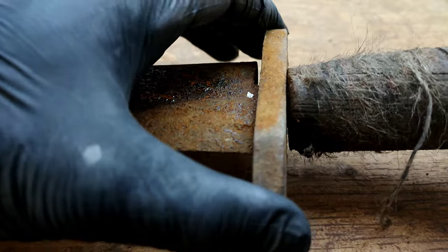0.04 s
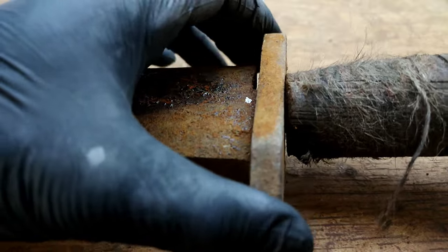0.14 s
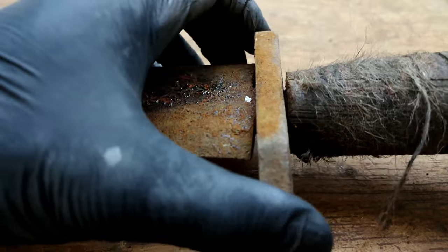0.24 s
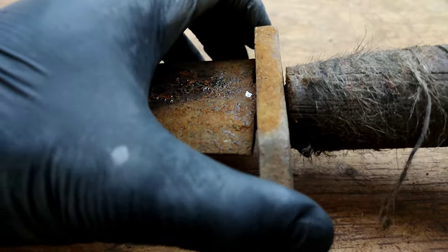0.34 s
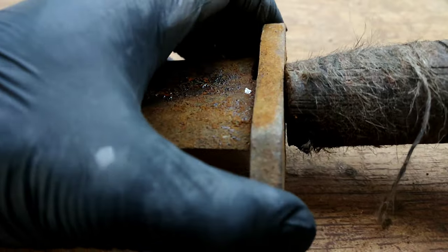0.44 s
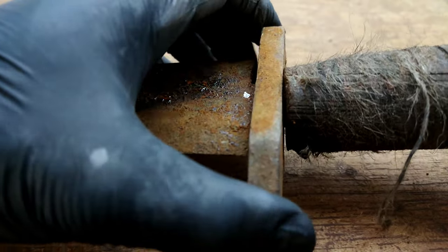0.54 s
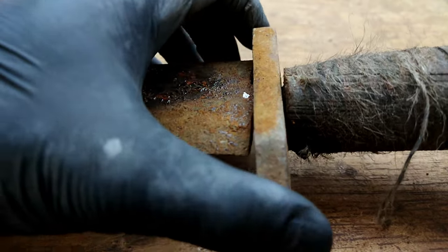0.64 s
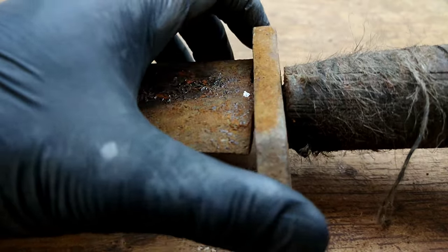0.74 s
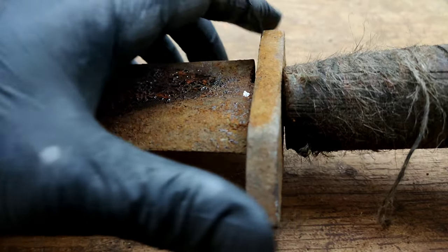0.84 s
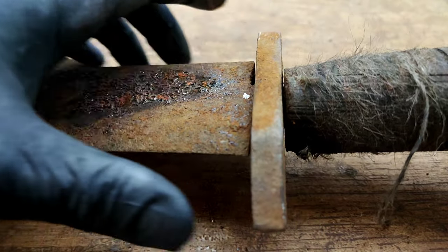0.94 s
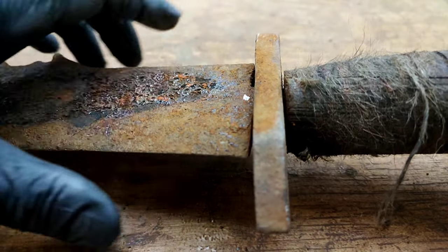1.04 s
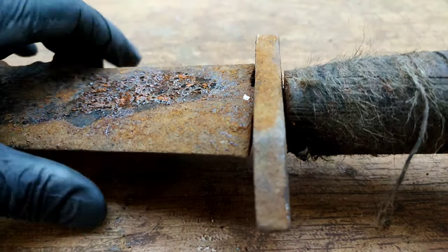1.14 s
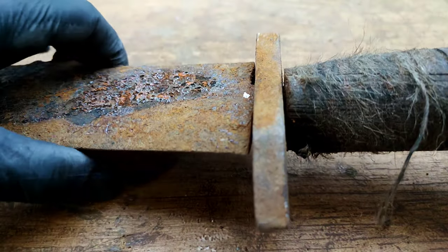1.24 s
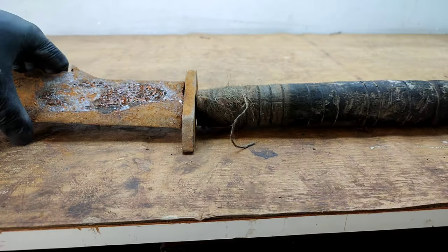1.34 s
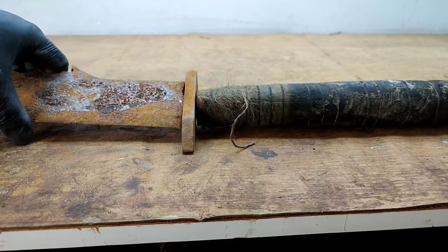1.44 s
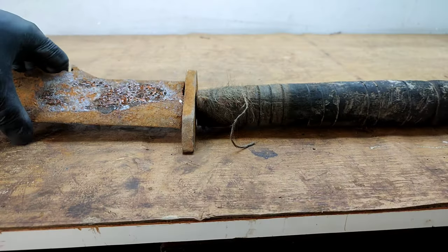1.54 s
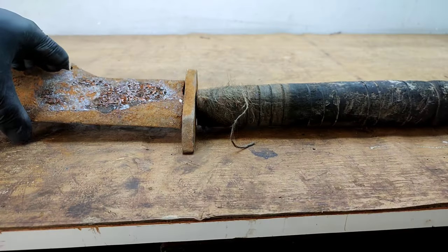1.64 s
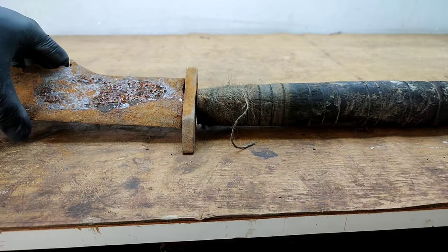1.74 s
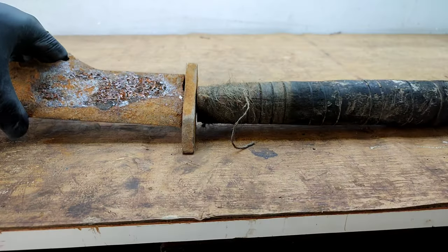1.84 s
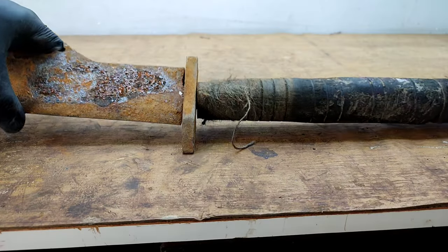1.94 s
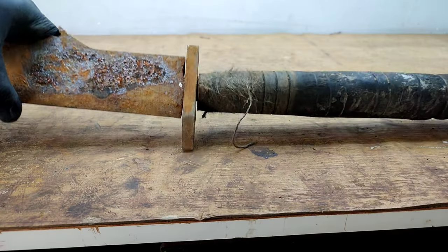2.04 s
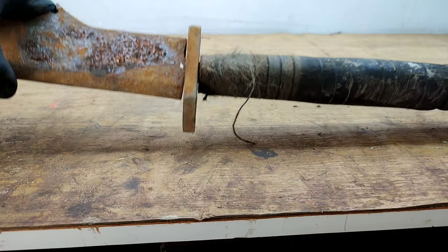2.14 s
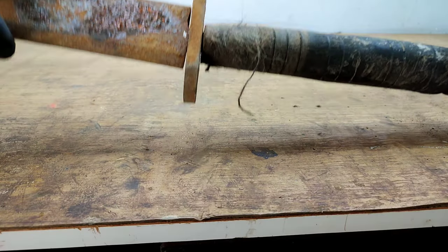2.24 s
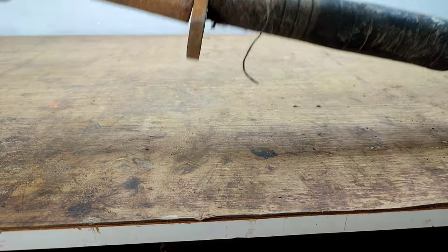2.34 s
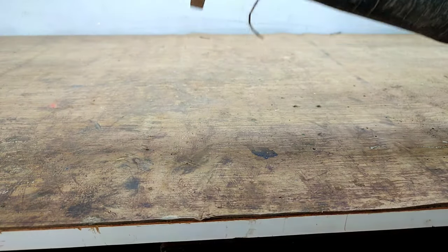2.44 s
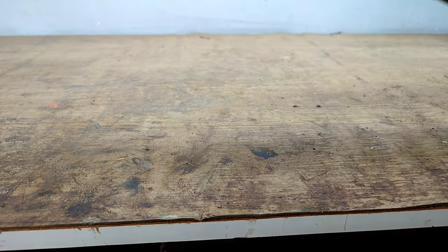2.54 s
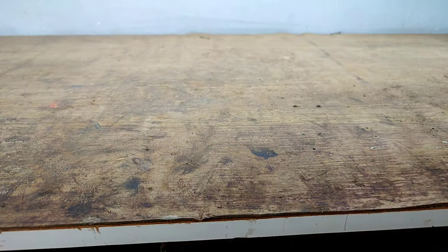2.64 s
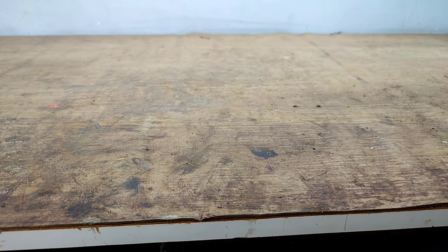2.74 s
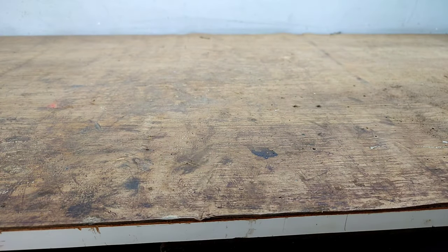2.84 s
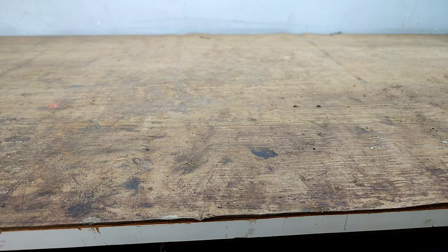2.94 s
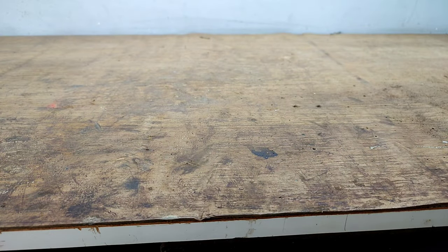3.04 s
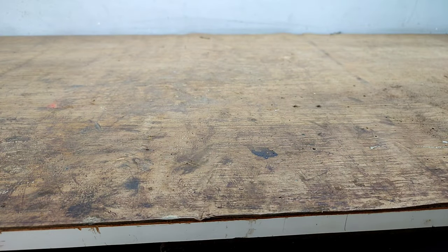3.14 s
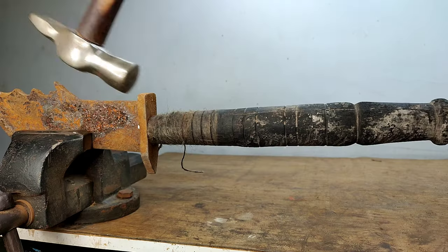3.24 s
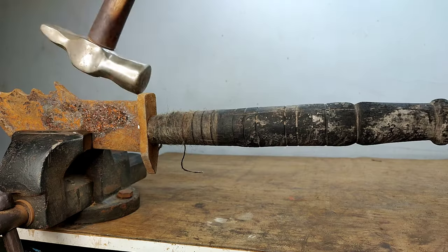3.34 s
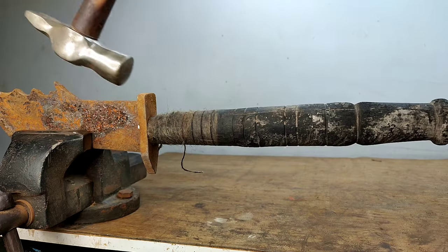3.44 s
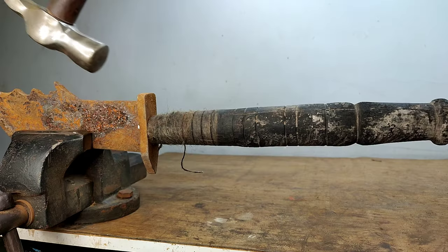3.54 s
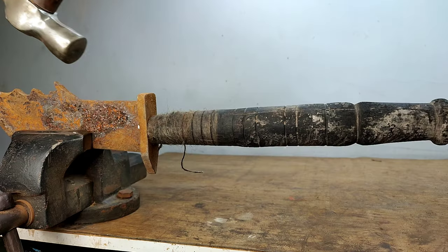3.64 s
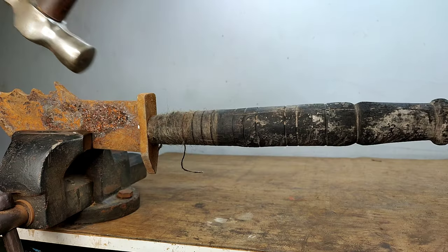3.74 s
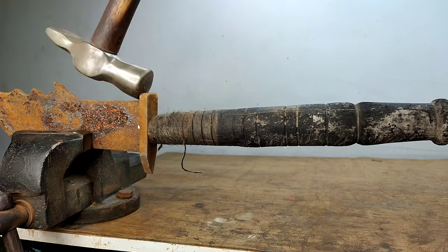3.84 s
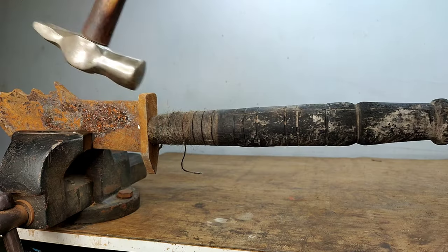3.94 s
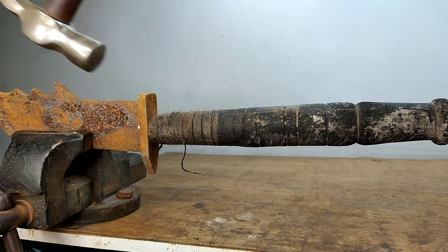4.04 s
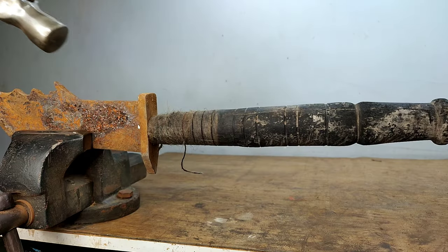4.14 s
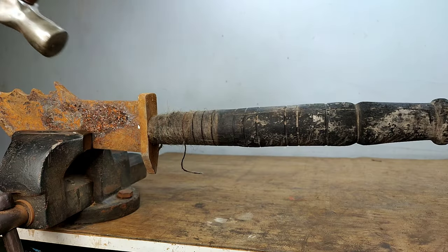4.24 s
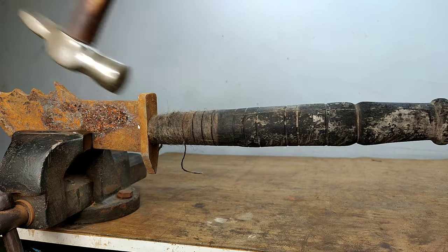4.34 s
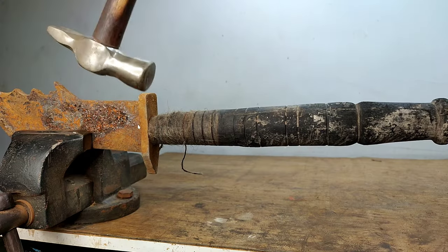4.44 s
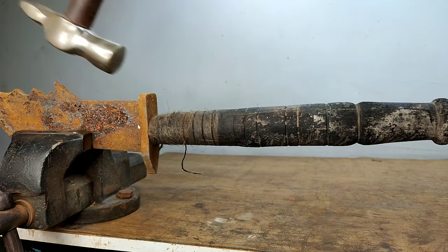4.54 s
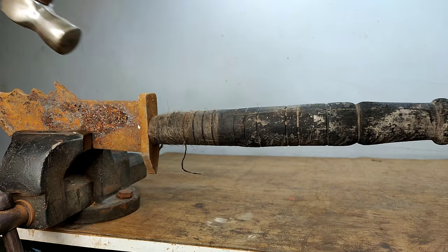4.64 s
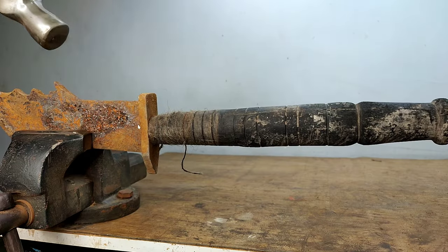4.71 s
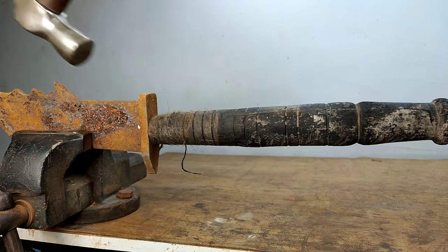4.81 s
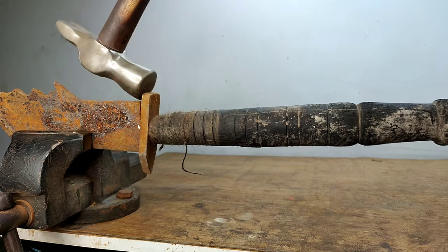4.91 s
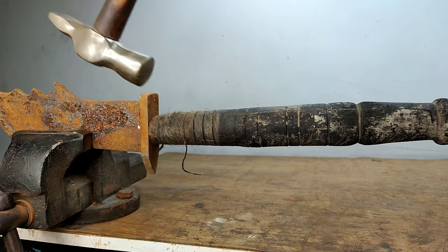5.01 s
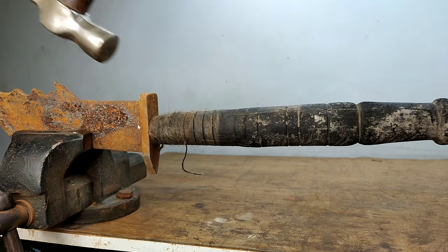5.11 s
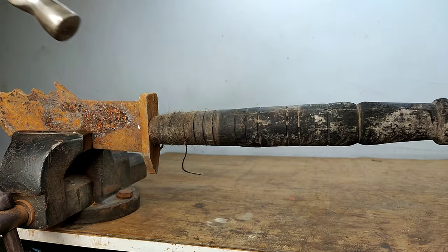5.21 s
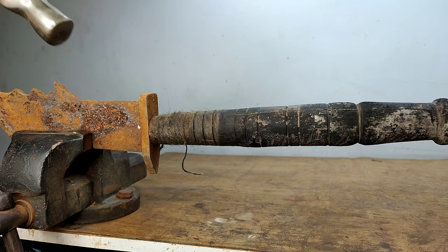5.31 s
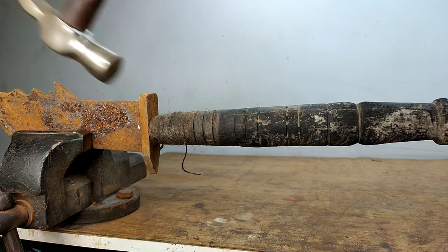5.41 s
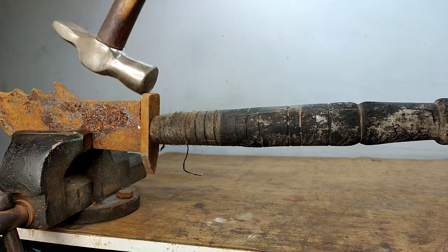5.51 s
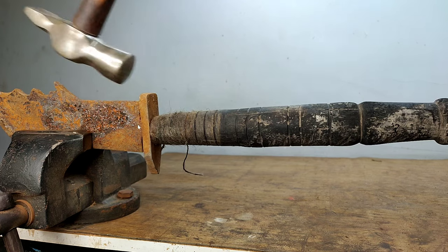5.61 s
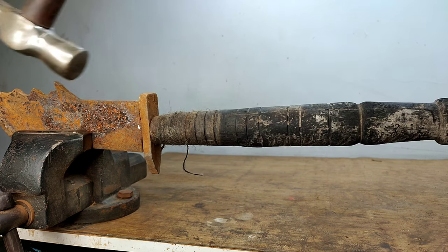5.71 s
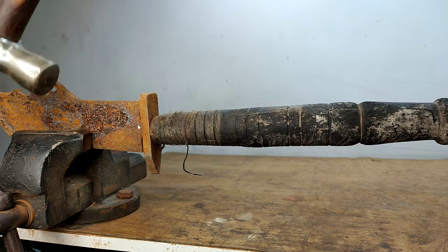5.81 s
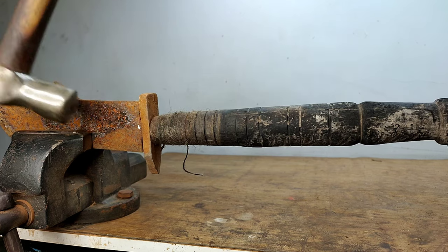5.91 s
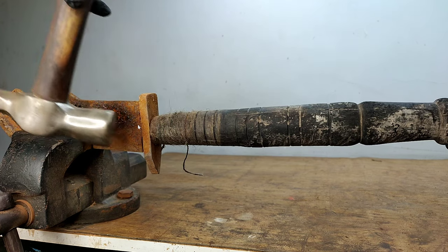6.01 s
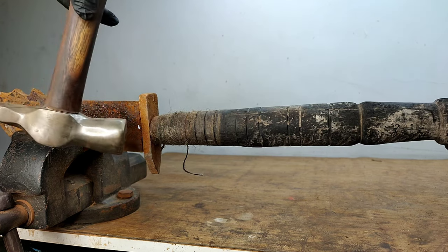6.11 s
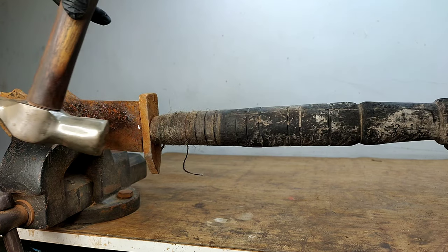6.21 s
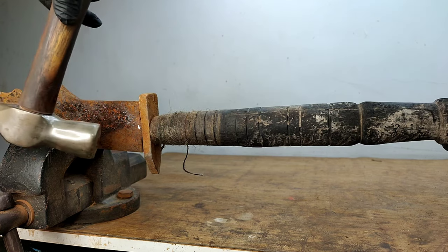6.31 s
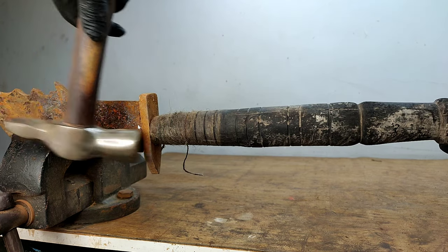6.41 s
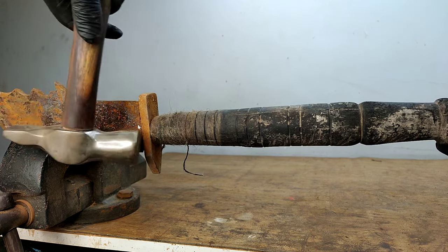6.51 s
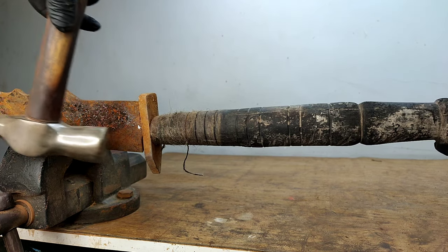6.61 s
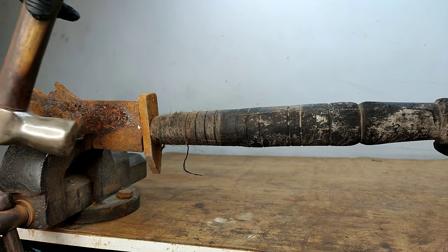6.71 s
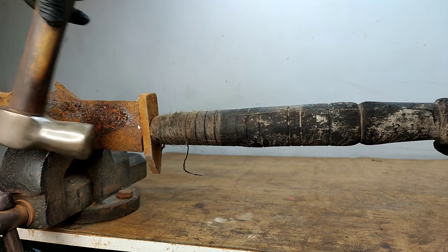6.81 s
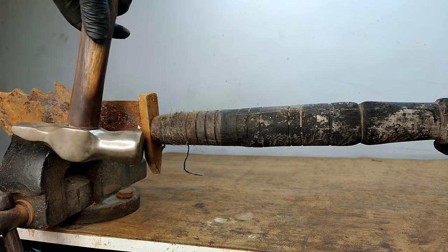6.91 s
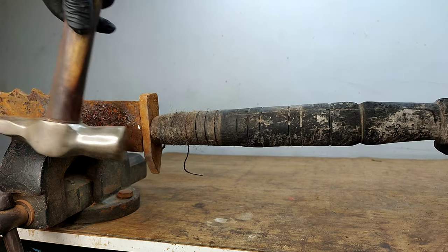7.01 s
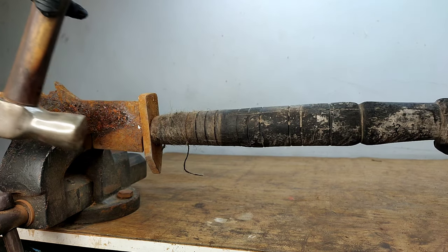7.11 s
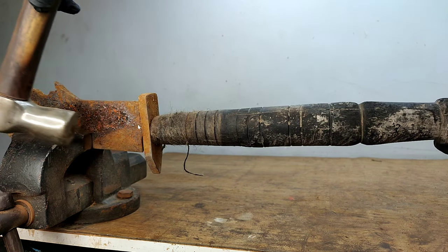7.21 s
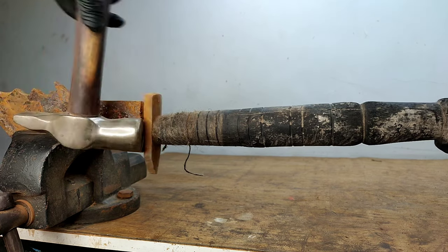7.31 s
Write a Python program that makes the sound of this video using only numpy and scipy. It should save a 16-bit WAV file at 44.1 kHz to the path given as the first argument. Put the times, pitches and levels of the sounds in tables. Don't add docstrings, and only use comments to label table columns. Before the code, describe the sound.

Gloved hands rub and knock a rusty blade on a wooden bench, then a small hammer strikes it seven times in a vise, loud and ringing.

```python
import sys
import numpy as np
from scipy import signal
from scipy.fft import next_fast_len
from scipy.io import wavfile
from scipy.ndimage import uniform_filter1d

SR = 44100
rng = np.random.default_rng(int(sys.argv[2]) if len(sys.argv) > 2 else 0)


def voltage_ratio(decibels):
    exponent = np.asarray(decibels, float) / 20
    return 10 ** exponent


def to_wav(s):
    ch = np.atleast_2d(s).T
    pcm = np.round(np.clip(ch, -1, 1) * 32767)
    wavfile.write(sys.argv[1], SR, pcm.astype(np.int16))


N = 324576

# f/Hz, level/dB per Hz
AIR = [(15, -27), (25, -4.5), (60, -1.5), (110, -10), (180, -13), (260, -19.5), (420, -31), (750, -40),
       (1400, -45), (14500, -54.5)]
AIR_DB = -54.5
# f/Hz, width/Hz, level/dB
DRONE = [(30, 1.9, -4.5), (56, 1.8, -6.5), (90.4, 1.9, -10.5), (154, 4, -17), (194, 8, -15.5)]
# start t/s, rumble level/dB, hiss level/dB
STRETCHES = [
    (0, -59.5, 0.5),
    (1.43, -64.5, -1.5),
    (3.2, -65, -1.5),
    (3.45, -59.5, 1),
]
# multiple of MOTOR_HZ/1, level/dB
MOTOR = [(1, -63), (2, -57), (3, -61), (4, -75)]
MOTOR_HZ, MOTOR_WAVER_DB = 46.7, 2.1
# f/Hz, likeness/1
LIKENESS = [(60, 0.86), (180, 0.99), (330, 0.76), (540, -0.022), (1610, -0.12), (4830, -0.042),
            (14400, -0.01)]
EDGES_HZ = 22 * 2 ** np.arange(0, 9.5, 1 / 3)

# start t/s, length t/s, low rub level/dB, bright rustle level/dB
STROKES = [(0.0, 0.059, -73, -89), (0.066, 0.087, -63.5, -77), (0.262, 0.028, -65, -82),
           (0.354, .09, -71, -72.5), (0.532, 0.047, -72, -70), (0.724, 0.078, -76, -74),
           (0.935, 0.059, -66, -72), (0.998, 0.018, -61, -63.5), (1.147, 0.036, -83, -71),
           (1.275, 0.081, -61, -69.5), (1.4, 0.0079, -66, -64.5), (1.707, .04, -71, -76),
           (1.957, 0.13, -69, -78), (2.145, 0.015, -68, -71.5), (2.212, 0.085, -69, -81),
           (2.494, .04, -70, -76), (2.548, 0.05, -68, -85)]
GRIP_DB_PER_S, LET_GO_DB_PER_S = 700, 236
# start t/s, length t/s, level/dB, favoured f/Hz
DRAGS = [
    (0, 0.088, -79.5, 1500),
    (0.357, 0.06, -88, 1500),
    (.6, .15, -89, 2200),
    (2.26, .2, -96, 1150),
]
# f/Hz, level/dB, decay t60/s
DRAG_MODES = [(740, -3.5, 0.05), (1020, 0.5, 0.025), (1500, -8, 0.02), (1820, -8, .02), (2060, -4, 0.022),
              (2250, -6, .018), (2450, -8, 0.02)]
# f/Hz, level/dB, decay t60/s
LIFTED_MODES = [(205, 1, .12), (330, -7, .1), (420, -12, .08), (500, -7, .06), (740, -9, .07),
                (1095, -2, .045), (1230, -6, .06), (1600, -18, .04), (1830, -11, .03), (2400, -13, .03)]
LIFTED_S = 2.0
# t/s, peak level/dB, favoured f/Hz
KNOCKS = [(0.124, -48.5, 1000), (0.262, -62.5, 2300), (0.563, -37, 1700), (0.586, -44.5, 895),
          (0.79, -52.5, 800), (0.811, -47.5, 1080), (0.962, -50.5, 650), (0.966, -61, 2300),
          (0.989, -41.5, 1700), (1.283, -69, 1800), (1.322, -61, 1530), (2.211, -54, 1250),
          (2.232, -48, 1090), (2.25, -48.5, 600), (3.074, -68, 800)]
# f/Hz, level/dB, decay t60/s
KNOCK_MODES = [(209, -5.5, 0.15), (355, -9, 0.1), (465, -12, 0.06), (605, -1, 0.04), (730, -3, 0.04),
               (1022, 3, 0.026), (1180, -12, 0.03), (1525, -10, 0.02), (1810, -1, 0.018), (2030, -7, .03),
               (2160, -1, 0.02), (2390, -1, 0.018), (2905, -12, .018)]
FAVOUR_DB_PER_OCT = 8.5
GRIT_DB, GRIT_T60_S = -19.5, 0.053
# t/s, peak level/dB, f/Hz
SNAPS = [
    (1.0894, -64, 3030),
    (1.9795, -54, 3390),
    (2.178, -43, 2680),
    (2.548, -44, 10000),
]

# f/Hz, level/dB, decay t60/s
WALLS = [(150, -6, 2.36), (390, 3.5, 1.41), (800, 5.5, 0.92), (1720, 4.5, 0.89), (3200, 4, 0.78),
         (7100, 7.5, 0.61), (10000, 9, 0.48), (14600, 6, 0.52)]
# f/Hz, width/Hz, share removed/1
NULLS = [(298, 64, 0.5), (835, 50, 0.4), (1197, 60, .3)]
SPOT_SHIFT = .04

# t/s, peak level/dB, room send level/dB, bench level/dB, boom level/dB
FIRST_BLOW = [
    (3.4481, -1.5, -6, 3, -3),
]
TOP_BLOWS = [
    (3.9936, -2.5, 0.61, 8.3, 3.5),
    (4.5416, -5.5, 0.48, 6.7, 0.1),
    (5.0685, -3, 1, 7.2, 1.7),
    (5.6203, -2, 1, 4.5, -0.4),
]
SIDE_BLOW = [
    (6.5922, -4, -4.5, -4, -1.5),
]
LAST_BLOW = [
    (7.0508, -2.1, 0.015, 0.67, 0),
]
# head squeal f/Hz, squeal level/dB, thud f/Hz, thud level/dB
TOUCHES = [
    (6300, -16.5, 440, -32.5),
    (6250, -11, 170, -21.5),
    (6300, -9, 250, -20),
    (6400, -8, 280, -19.5),
    (6170, -11.5, 262, -18),
    (6120, -40, 343, -19.5),
    (6370, -13, 320, -27),
]
SQUEAL_DELAYS_S = [-.0027, -.0003, -.0001, -.0004, -.001, .0005, .0003]
SQUEAL_S, SQUEAL_PARTNER = .0036, 1.16
THUD_T60_S, THUD_PAN_DB = .05, 5
# delay t/s, level/dB
FIRST_CONTACTS = [
    (-.0024, 0.5),
    (.002, 3),
    (.005, 2),
    (.009, -0.5),
]
CONTACTS = [
    (-.002, -15),
    (0.0003, -4),
    (.0031, 5.5),
    (.0048, 2),
    (.0075, -1),
    (.011, -6),
]
SIDE_CONTACTS = [
    (-.002, -25),
    (.0006, 6),
    (.0024, 2),
    (.0044, 3),
    (.006, 1),
]
# f/Hz, level/dB per Hz
FIRST_CRACK = [(88, -42.5), (150, -10.5), (1700, -16), (2590, -21.5), (3450, -6), (3950, -12.5),
               (7710, -17), (9700, -31.5), (11100, -30.5), (13200, -53), (14500, -83)]
TOP_CRACK = [(88, -38.5), (150, -15), (823, -16.5), (2640, -14.5), (2910, -11.5), (4180, -17), (6370, -9.5),
             (9700, -21.5), (10500, -19.5), (13700, -21), (14500, -41)]
SIDE_CRACK = [(88, -31), (150, 18.5), (595, -8), (1520, 7), (1770, -15), (2220, 5), (5160, 0.5),
              (7710, -10), (11500, -90), (12400, -29.5), (14500, -38)]
# f/Hz, level/dB, decay t60/s
FIRST_GUARD = [(1592, -15, 0.014), (2900, -17, .02), (3490, -2.5, 0.03), (4520, -13.5, 0.011),
               (5460, -10.5, 0.01), (6260, -12, 0.011), (7450, -8, 0.014)]
TOP_GUARDS = [
    [(1090, -8, 0.017), (1590, -20.5, 0.01), (2970, -16, .02), (3750, -7, 0.028), (4700, -10.5, .02),
     (5440, -12, .015), (6250, -8, .012), (7490, -11.5, .015), (8750, -12, 0.022), (10150, -13, .035)],
    [(1500, -6, .018), (3040, -18, .012), (3490, -6, .03), (3800, -9, .02), (5500, -7.5, .02),
     (6230, -3.5, .02), (7300, -8, .02), (8860, -13, 0.022), (10400, -11, .035)],
    [(2104, -13.5, 0.018), (2500, -10, .018), (2900, -2.5, .025), (3680, -12.5, .02), (4830, -12, 0.018),
     (5200, -13.5, .015), (6660, -9, 0.018), (7100, -11, .015), (8350, -9.5, .02), (10500, -1.5, .035)],
    [(2830, -12.5, .02), (3166, -4, .025), (3800, -5, .025), (4614, -11.5, .02), (5280, -10.5, .02),
     (6000, -9.5, .02), (6520, -7, .02), (6850, -11, .015), (10250, -6, .035)],
]
SIDE_GUARD = [(1468, -8.5, 0.028), (2064, -5, 0.021), (2550, -21, 0.014), (3220, -16, 0.016),
              (5810, -30, 0.005), (7260, -14, 0.013), (10200, -44, 0.016)]
LAST_GUARD = [(1549, -22, 0.024), (2256, -4.5, 0.04), (2734, -8, 0.028), (3200, -15, 0.013),
              (3870, -10.5, 0.017), (6530, -4, 0.012), (7700, -3, 0.0143), (10230, -14.5, 0.023)]
# f/Hz, level/dB, decay t60/s
HAMMER = [(6635, -28.5, .13), (6560, -33, .05), (6310, -31, .035), (6440, -30, .04), (8750, -33, .04),
          (10350, -32, .07), (12220, -38, .06), (13400, -37, .06)]
# guard f/Hz, guard ring level/dB, hammer ring level/dB
TONES = [
    (3570, -13, -13.5),
    (4430, -22.5, -4),
    (3530, -18.5, -5),
    (2426, -18, -4),
    (3550, -18, -1.5),
    (2020, -39, -25),
    (2307, -24, -7.5),
]
# f/Hz, level/dB, decay t60/s
BENCH = [(345, -15, .12), (378, -14, .12), (412, -17, .1), (447, -15, .1), (474, -14, .12), (510, -19, .1),
         (546, -13, .14), (580, -18, .1), (607, -13, .14), (640, -17, .1), (673, -14, .14), (705, -16, .1),
         (745, -14, .12), (770, -17, .09)]
# f/Hz, level/dB, decay t60/s
BENCH_TOP = [(857, -16, 0.059), (950, -20.5, 0.046), (977, -17, 0.096), (1010, -15.5, 0.2),
             (1041, -26, 0.14), (1063, -19.5, 0.098)]
# low f/Hz, high f/Hz, upper modes level/dB
SPOTS = [
    (421, 634, -12),
    (610, 770, -8),
    (480, 680, -11),
    (460, 680, -4.5),
    (655, 940, -5),
    (340, 460, -20.5),
    (374, 400, -5.5),
]
SPOT_EDGE_DB_PER_OCT = 80
# f/Hz, level/dB
RINGS = [
    [(447, -15.5), (562, -13), (592, -22), (625, -25), (861, -22)],
    [(335, -26), (545, -22.5), (607, -17.5), (640, -17), (671, -17.5), (729, -20), (775, -22)],
    [(335, -22.5), (485, -23), (518, -26.5), (565, -13.5), (605, -19), (628, -16.5), (672, -24)],
    [(335, -21.5), (450, -24.5), (483, -17.5), (518, -20), (605, -14.5), (636, -17.5), (671, -19.5),
     (1085, -21.5)],
    [(224, -15.5), (248, -13), (330, -19), (672, -17), (694, -17.5), (728, -15.5), (760, -17)],
    [(205, -17), (250, -12.5), (378, -17), (1030, -25)],
    [(205, -14.5), (250, -13.5), (378, -15.5), (432, -16), (453, -15.5)],
]
RING_T60_S, LOOSE_DB = 0.21, -6
MONO_BELOW_HZ = 400
SHIVER_DB, SHIVER_RISE_S, SHIVER_T60_S = -34, 0.018, 1.106
# f/Hz, level/dB per Hz
FIRST_WASH = [(88, -48), (150, -3), (216, 0), (287, -21), (329, -10), (473, -3.5), (760, -13.5),
              (1300, -11), (5790, -16), (6490, -18), (8490, -30.5), (11100, -28), (13700, -33),
              (14500, -73)]
TOP_WASH = [(88, -28), (150, -4), (304, -14), (410, -13.5), (580, -16), (850, -8), (1030, -15),
            (1410, -12.5), (3450, -11.5), (5060, -15.5), (6490, -15), (8170, -22), (10500, -20.5),
            (13400, -34.5), (14500, -58)]
SIDE_WASH = [(88, -3.5), (150, 2), (251, -3.5), (304, -10), (335, -3.5), (455, -17.5), (530, -4),
             (906, -13), (2100, -14.5), (4180, -15.5), (12700, -43), (14500, -82)]
LAST_WASH = [(88, -7), (150, 0), (251, -4.5), (304, -7), (369, -13), (748, -9.5), (941, -17), (2060, -6),
             (6750, -16), (10500, -27.5), (11100, -76), (12700, -66), (14500, -79)]
# f/Hz, width/Hz, share removed/1 (below 0 added)
NODES = [
    [(2670, 300, 0.33), (1570, 200, 0.25)],
    [(1360, 150, 0.77), (2700, 230, .35), (3200, 250, 0.28), (5600, 710, 0.32), (440, 210, .5)],
    [(2570, 350, .4), (2900, 260, 0.98), (4740, 300, .75), (420, 120, .5), (7100, 500, -0.81),
     (3500, 300, -.5)],
    [(1490, 370, .3), (3570, 400, .3), (5420, 300, .35), (400, 120, 0.87), (4950, 250, .6),
     (2900, 200, -0.15)],
    [(2510, 410, .45), (3200, 500, -0.48), (1300, 100, -0.32), (162, 60, .8), (560, 100, 0.57)],
    [(1300, 220, -0.61), (1730, 330, 0.14), (2090, 140, -0.87), (3020, 380, -0.82), (3750, 180, -0.039),
     (774, 280, 0.42)],
    [(1270, 270, -1.1), (1700, 350, 0.45), (2450, 300, -0.68), (3030, 210, 0.59), (3380, 350, -0.48),
     (6050, 370, 0.47)],
]
# f/Hz, level/dB, decay t60/s, build-up delay t/s
BOOM = [(31.5, -22, .65, 0), (47, -20, 1.4, .0013), (55, -12, .72, .0065), (66, -18, .88, .0045),
        (80, -23, .6, .003), (89.5, -18, .6, .0047), (100, -22, .6, .001), (111, -25, .7, .004),
        (123, -23, 1.0, .002), (147, -30, .9, .003), (210, -35, 1.1, .002), (250, -34, 1.0, .002)]

# t/s, duck level/dB, baseline sag/1
DUCKS = [
    (3.439, 0.4, 0.01),
    (3.994, 6, 0.1),
    (4.541, 7.5, 0.09),
    (5.067, 7.5, 0.13),
    (5.62, 8, 0.14),
    (6.59, 1.4, 0.03),
    (7.048, 7, 0.03),
]
DUCK_S, SAG_DELAY_S, SAG_S = 0.097, 0.0047, 0.031
# start t/s, end t/s
CUTS = [
    (1.421, 1.437),
    (3.92, 3.934),
]
# low f/Hz, high f/Hz, share/1
RIGHT_LIFT = [(1500, 3800, .06), (4000, 7000, 0.14), (8000, 10000, -0.094)]
MIC_TOP_HZ = 13900


def rms_one(x):
    return x / np.sqrt(np.mean(x ** 2) + 1e-20)


def at_hz(points, hz, axis=1):
    points = np.array(points)
    return np.interp(np.log(hz), np.log(points[:, 0]), points[:, axis])


def ring(clicks, hz, t60):
    r = voltage_ratio(-60 / (max(t60, .002) * SR))
    w = 2 * np.pi * hz / SR
    return signal.lfilter([0, np.sin(w)], [1, -2 * r * np.cos(w), r * r], clicks + 1e-18)


def band(x, low_hz, high_hz, order=2):
    return signal.sosfilt(signal.butter(order, [low_hz, high_hz], "band", fs=SR, output="sos"), x)


def bank(size, gain, white=None):
    if white is None:
        white = rng.standard_normal((2, 2, size))
    out = 0
    for k, (low, high) in enumerate(zip(EDGES_HZ, EDGES_HZ[1:])):
        mid, side = band(white[k % 2], low, high)
        hz = np.sqrt(low * high)
        alike = np.clip(at_hz(LIKENESS, hz), -1, 1)
        stereo = np.sqrt(1 + alike) * mid + np.sqrt(1 - alike) * side * [[1], [-1]]
        out = out + gain(hz) * stereo
    return out


def add(bus, sound, s):
    at = round(s * SR)
    bus[..., at:at + sound.shape[-1]] += sound[..., :N - at]


def modes(table, clicks, spread_db):
    strengths = voltage_ratio(spread_db * rng.standard_normal((len(table), 2, 1)))
    return sum(g * voltage_ratio(db) * ring(clicks, hz, t60) for g, (hz, db, t60) in zip(strengths, table))


def carve(x, dips):
    for hz, width, share in dips:
        x = x - np.clip(share, -1, 1) * band(x, hz - width / 2, hz + width / 2, order=1)
    return x


def favour(table, centre_hz, db_per_oct):
    return [(hz, db - db_per_oct * (hz > 500) * abs(np.log2(hz / centre_hz)), t60) for hz, db, t60 in table]


def room_tone():
    t = np.arange(N) / SR
    s, rumble_db, hiss_db = np.transpose(STRETCHES)
    now = np.searchsorted(s, t, side="right") - 1
    swell = voltage_ratio(rumble_db[now] + 55.5)
    hiss = voltage_ratio(hiss_db[now])
    air = rms_one(bank(N, lambda hz: voltage_ratio(at_hz(AIR, hz)) * (swell if hz < 420 else hiss)))
    mid, side = rng.standard_normal((2, N))
    white = mid + .3 * side * [[1], [-1]]
    drone = 0
    for hz, width, db in DRONE:
        drone = drone + voltage_ratio(db) * rms_one(band(white, hz - width / 2, hz + width / 2, order=1))
    hum = 0
    for k, db in MOTOR:
        waver = np.interp(t, np.arange(41) / 5, rng.standard_normal(41))
        hum = hum + voltage_ratio(db + MOTOR_WAVER_DB * waver) * np.sin(2 * np.pi * round(k) * MOTOR_HZ * t)
    return voltage_ratio(AIR_DB) * air + voltage_ratio(AIR_DB + 4.0) * swell * drone + hum


def glove_strokes():
    grains = rng.standard_normal((2, 2, N)) * voltage_ratio(2 * rng.exponential(1, (2, 2, N)))
    rub = rms_one(band(grains[0], 1240, 3540))
    rustle = rms_one(band(grains[1], 3800, 14500))
    rubbing, t = 0, np.arange(N) / SR
    for s, length, rub_db, rustle_db in STROKES:
        before, after = np.maximum(s - t, 0), np.maximum(t - s - length, 0)
        loss_db = GRIP_DB_PER_S * before + LET_GO_DB_PER_S * after
        grip = voltage_ratio(-np.minimum(loss_db, 200))
        rubbing = rubbing + grip * (voltage_ratio(rub_db - 6.5) * rub + voltage_ratio(rustle_db) * rustle)
    return rubbing


def blade_drags():
    out = np.zeros((2, N))
    for s, length, db, centre_hz in DRAGS:
        slips = rng.standard_normal((2, SR // 2)) * (np.arange(SR // 2) < length * SR)
        dragged = favour(DRAG_MODES if s < LIFTED_S else LIFTED_MODES, centre_hz, db_per_oct=3)
        add(out, voltage_ratio(db) * modes(dragged, slips, spread_db=5.5), s)
    return out


def workshop(x):
    t = np.arange(int(1.6 * SR)) / SR
    tail = bank(len(t), lambda hz: (hz > 110) * voltage_ratio(at_hz(WALLS, hz) - 60 * t / at_hz(WALLS, hz, axis=2)))
    tail *= (t > .003) * (1 + 0.52 * voltage_ratio(-60 * t / 0.027))
    out = np.zeros((2, N))
    starts = [0] + [round(row[0] * SR) - 200 for row in DUCKS] + [N]
    shifts = rng.uniform(-SPOT_SHIFT, SPOT_SHIFT, len(starts))
    for a, b, shift in zip(starts, starts[1:], shifts):
        echoes = signal.resample(tail, next_fast_len(int(len(t) * (1 + shift))), axis=1)
        add(out, signal.fftconvolve(x[None, a:b], voltage_ratio(-31.5) * echoes, axes=1), a / SR)
    return carve(out, NULLS)


def blade_knocks():
    out, click = np.zeros((2, N)), np.eye(1, SR // 2)[0]
    grind = voltage_ratio(GRIT_DB - 60 * np.arange(SR // 2) / SR / GRIT_T60_S)
    for s, db, centre_hz in KNOCKS:
        soft = band(click + grind * rng.standard_normal((2, SR // 2)), 100, 2900, order=4)
        struck = favour(KNOCK_MODES if s < LIFTED_S else LIFTED_MODES, centre_hz, FAVOUR_DB_PER_OCT)
        add(out, voltage_ratio(db - 2.5) * modes(struck, soft, spread_db=3.5), s)
    return out


def glove_snaps():
    out = np.zeros((2, N))
    for s, db, hz in SNAPS:
        burst = rng.standard_normal((2, 400)) * voltage_ratio(-60 * np.arange(400) / SR / 0.009)
        add(out, voltage_ratio(db + 3) * band(burst, hz / 1.6, min(hz * 1.6, 15000)), s)
    return out


def touch(delay, squeal_hz, squeal_db, thud_hz, thud_db):
    t = np.arange(4096) / SR - .005
    pressed = np.sin(np.pi * np.clip((t - delay) / SQUEAL_S, 0, 1) ** .7)
    squeal = np.sin(2 * np.pi * squeal_hz * t) + .3 * np.sin(2 * np.pi * SQUEAL_PARTNER * squeal_hz * t)
    thud_fade = voltage_ratio(thud_db - 60 * np.maximum(t, 0) / THUD_T60_S)
    thud = thud_fade * np.sin(2 * np.pi * thud_hz * np.maximum(t - .002, 0))
    return voltage_ratio(squeal_db) * pressed * squeal + thud * voltage_ratio(THUD_PAN_DB * np.array([[1], [-1]]))


def blow(contacts, crack, guard):
    clicks = np.zeros(4096)
    for delay, db in contacts:
        clicks[round((.005 + delay) * SR)] = voltage_ratio(db)
    fade = signal.lfilter([1], [1, -voltage_ratio(-60 / (0.0084 * SR))], clicks)
    grit = fade * rms_one(bank(len(clicks), lambda hz: voltage_ratio(at_hz(crack, hz))))
    return 0.22 * modes(guard, clicks, spread_db=4.0) + 0.4 * grit


def hammer_head(guard_hz, guard_db, head_db):
    click = np.eye(1, SR // 2)[0]
    head = voltage_ratio(head_db + 2.5) * modes(HAMMER, click, spread_db=3.0)
    return head + voltage_ratio(guard_db) * ring(np.roll(click, 400), guard_hz, .007)


def bench_ring(spot, rings, bench_db):
    low_hz, high_hz, upper_db = spot
    t = np.arange(SR) / SR
    shiver = voltage_ratio(SHIVER_DB - 60 * t / SHIVER_T60_S) * (1 - np.exp(-t / SHIVER_RISE_S))
    near = []
    for hz, db, t60 in BENCH:
        octaves_off = np.log2(max(low_hz / hz, hz / high_hz, 1))
        near.append((hz, db + LOOSE_DB - SPOT_EDGE_DB_PER_OCT * octaves_off, t60))
    near += [(hz, db + upper_db, t60) for hz, db, t60 in BENCH_TOP]
    near += [(hz, db, RING_T60_S) for hz, db in rings if hz > MONO_BELOW_HZ]
    deep = [(hz, db, RING_T60_S) for hz, db in rings if hz <= MONO_BELOW_HZ]
    deep = deep or [(250, -30.5, RING_T60_S)]
    wide = .85 * rng.standard_normal((2, SR)) + .55 * rng.standard_normal(SR)
    narrow = .3 * rng.standard_normal((2, SR)) + rng.standard_normal(SR)
    upper = modes(near, shiver * wide, spread_db=2.5)
    lower = modes(deep, shiver * narrow, spread_db=1.0)
    return voltage_ratio(bench_db - 12) * (upper + lower)


def wash(colour):
    click = np.eye(1, 8192)[0] * [[[1], [0]], [[-1], [0]]]
    shaped = bank(0, lambda hz: voltage_ratio(at_hz(colour, hz)), white=click)[0]
    return rms_one(shaped) / np.sqrt(len(shaped))


def standing_waves(push):
    sides = voltage_ratio(np.outer(1.4 * (-1) ** np.arange(len(BOOM)) + .6, [-1, 1]))
    boom = 0
    for side, (hz, db, t60, lag) in zip(sides, BOOM):
        late = np.roll(push, round(lag * SR))
        late[late > 0] *= voltage_ratio((hz > 70) * 2.0 * rng.standard_normal(len(DUCKS)))
        boom = boom + side[:, None] * voltage_ratio(db) * (ring(late, hz, t60) - ring(late, hz, 0.21))
    return boom


def hammering():
    direct, send, push = np.zeros((2, N)), np.zeros(N), np.zeros(N)
    blows = [(FIRST_BLOW[0], FIRST_CONTACTS, FIRST_CRACK, FIRST_GUARD, FIRST_WASH)]
    blows += [(row, CONTACTS, TOP_CRACK, guard, TOP_WASH) for row, guard in zip(TOP_BLOWS, TOP_GUARDS)]
    blows += [(SIDE_BLOW[0], SIDE_CONTACTS, SIDE_CRACK, SIDE_GUARD, SIDE_WASH)]
    blows += [(LAST_BLOW[0], SIDE_CONTACTS, SIDE_CRACK, LAST_GUARD, LAST_WASH)]
    places = zip(TONES, SPOTS, NODES, RINGS, SQUEAL_DELAYS_S, TOUCHES)
    for (row, contacts, crack, guard, colour), (tone, spot, nodes, rings, delay, first) in zip(blows, places):
        s, peak_db, send_db, bench_db, boom_db = row
        head = hammer_head(*tone)
        add(direct, voltage_ratio(peak_db) * blow(contacts, crack, guard) + touch(delay, *first), s - .005)
        add(direct, bench_ring(spot, rings, bench_db), s)
        add(direct, 0.22 * head, s)
        add(send, voltage_ratio(send_db + 9.0) * carve(wash(colour), nodes), s)
        add(send, head[0], s)
        push[round((s + .001) * SR)] = voltage_ratio(boom_db)
    return direct, send, standing_waves(push)


def scene():
    tone = room_tone()
    rubbing = glove_strokes()
    handled = blade_drags() + blade_knocks() + glove_snaps()
    direct, send, boom = hammering()
    send += .14 * carve(handled[0], [(1022, 160, .6)])
    return direct + boom + handled + rubbing + workshop(send) + tone


def masked_treble(x, below_db):
    hz, _, z = signal.stft(x, SR, nperseg=2048)
    power = np.abs(z[:, :1024]) ** 2
    bands = power.reshape(2, 128, 8, -1).sum(axis=2)
    chance = 3 * uniform_filter1d(rng.standard_normal(bands.shape[1:]), size=9, axis=1)
    limit = power.sum(axis=(0, 1)) * voltage_ratio(2 * below_db + 11 * chance)
    muted = np.repeat(bands.sum(axis=0) < limit, 8, axis=0) & (hz[:1024, None] > 7600)
    kept = np.vstack([np.where(muted, .1, 1), np.ones((1, z.shape[-1]))])
    return signal.istft(z * kept, SR, nperseg=2048)[1][:, :N]


def top_cut(x):
    return signal.sosfilt(signal.butter(12, 15050, fs=SR, output="sos"), x)


def record(dry):
    t, duck_db, kick, gate = np.arange(N) / SR, np.zeros(N), np.zeros(N), np.ones(N)
    for s, depth_db, sag in DUCKS:
        corners = s + np.cumsum([.006, .008, DUCK_S - .02, .01])
        duck_db -= depth_db * np.interp(t, corners, [0, 1, 1, 0])
        at = round((s + SAG_DELAY_S) * SR)
        kick[at:] -= 2.7 * sag * np.maximum(1 - t[:N - at] / SAG_S, 0)
    low = signal.sosfiltfilt(signal.butter(2, 900, fs=SR, output="sos"), dry)
    bass = signal.sosfiltfilt(signal.butter(1, 110, fs=SR, output="sos"), dry)
    out = bass * voltage_ratio(1.8 * duck_db) + (low - bass) * voltage_ratio(1.1 * duck_db) + (dry - low) * voltage_ratio(duck_db)
    out += band(kick, 3, 50, order=1)
    for low_hz, high_hz, share in RIGHT_LIFT:
        out += share * band(out, low_hz, high_hz, order=1) * [[-1], [1]]
    for start, end in CUTS:
        gate *= np.interp(t, [start - .001, start, end, end + 0.0021], [0.99, 0.01, 0.0068, 0.99])
    limited = 0.92 * np.tanh(out * gate / 1.112)
    heard = signal.sosfilt(signal.butter(10, MIC_TOP_HZ, fs=SR, output="sos"), limited)
    mix = masked_treble(heard, below_db=-47.0)
    return top_cut(mix)


dry = scene()
out = record(dry)
to_wav(out)
```